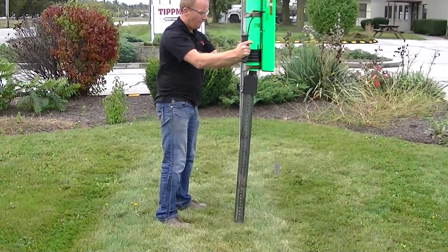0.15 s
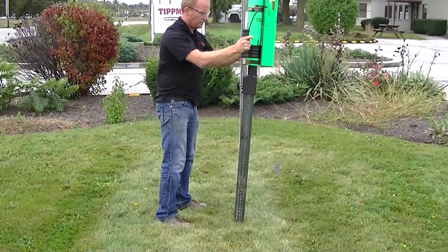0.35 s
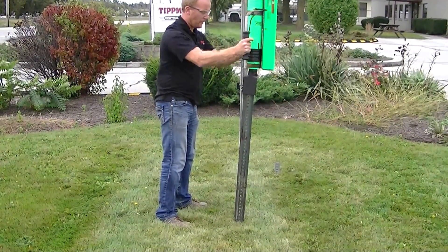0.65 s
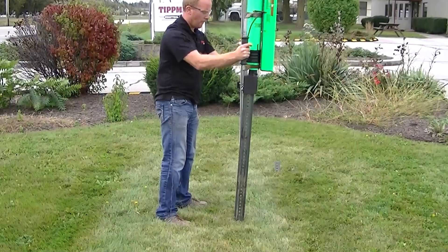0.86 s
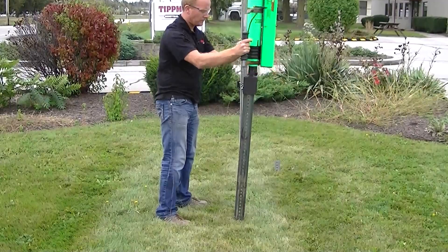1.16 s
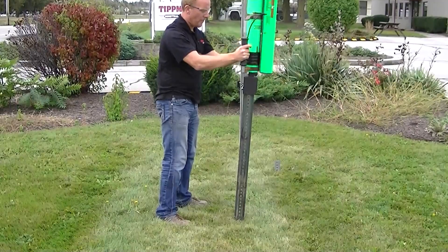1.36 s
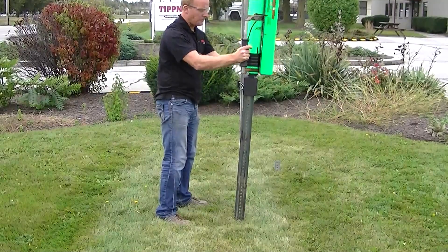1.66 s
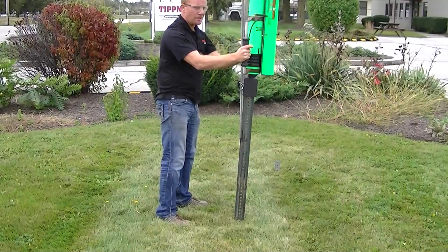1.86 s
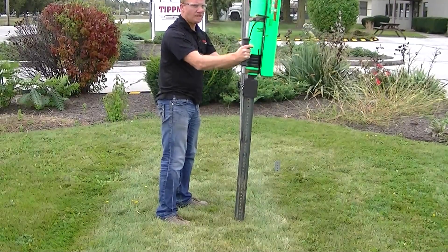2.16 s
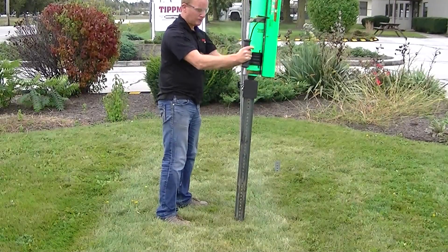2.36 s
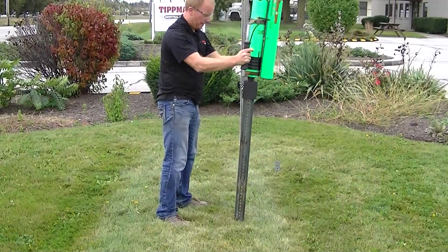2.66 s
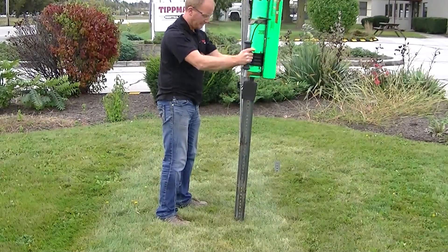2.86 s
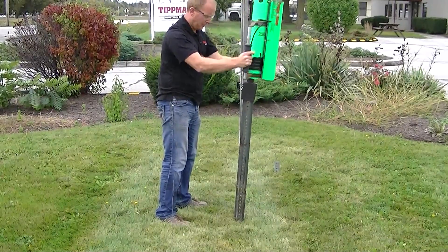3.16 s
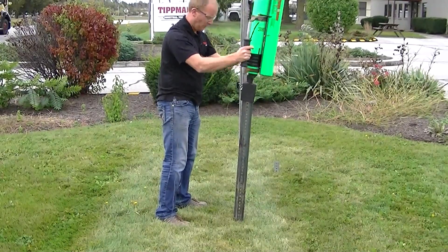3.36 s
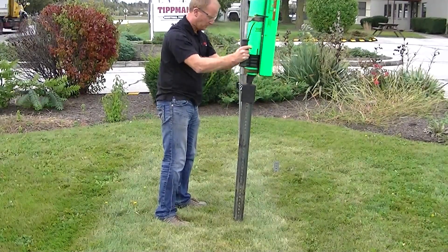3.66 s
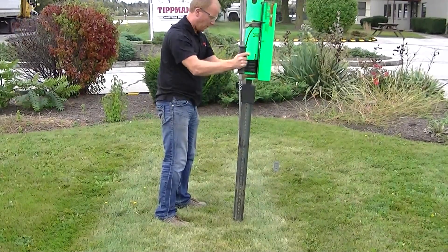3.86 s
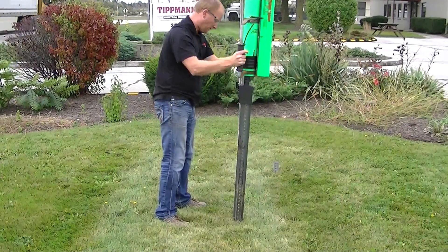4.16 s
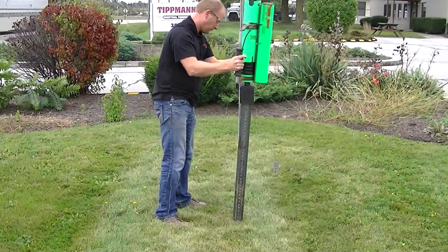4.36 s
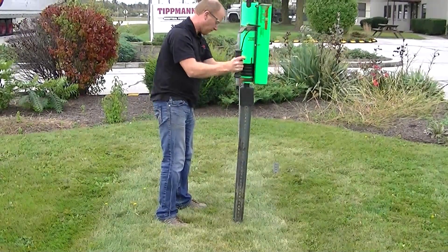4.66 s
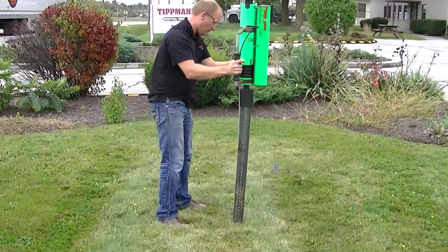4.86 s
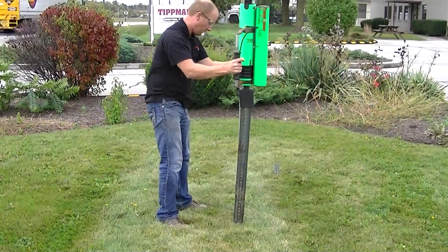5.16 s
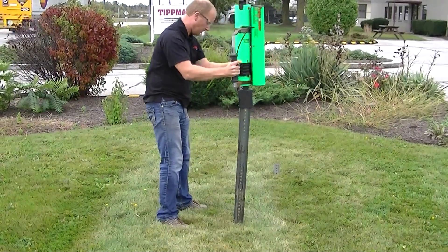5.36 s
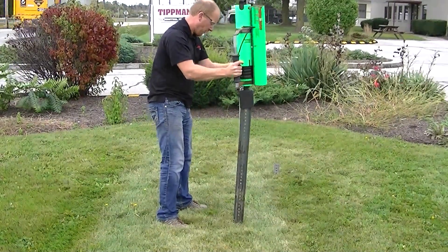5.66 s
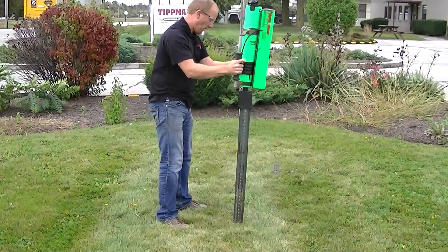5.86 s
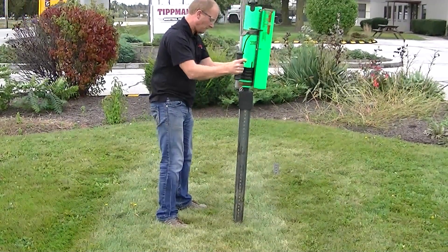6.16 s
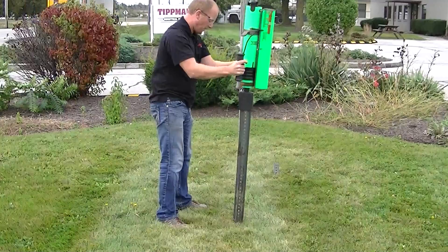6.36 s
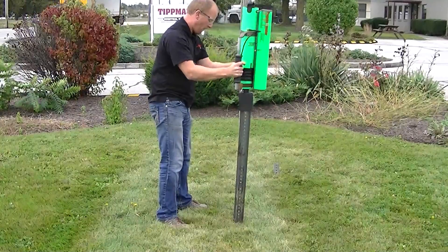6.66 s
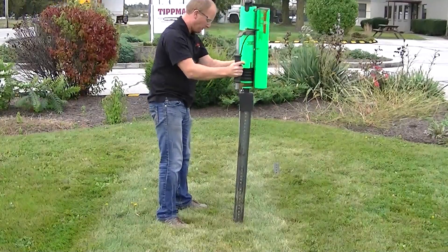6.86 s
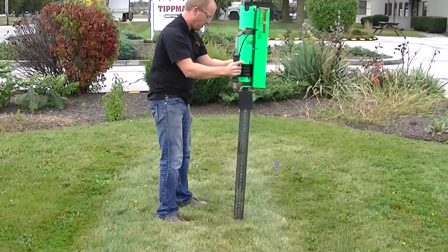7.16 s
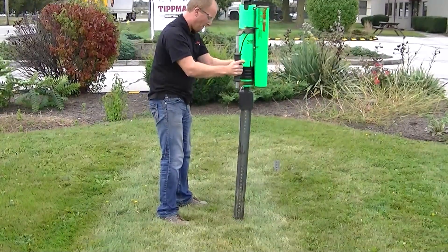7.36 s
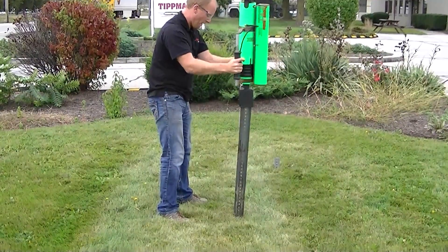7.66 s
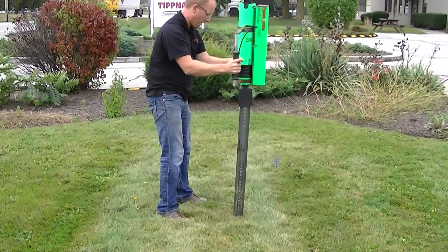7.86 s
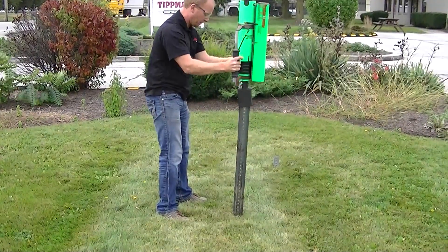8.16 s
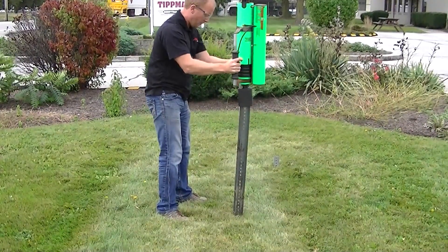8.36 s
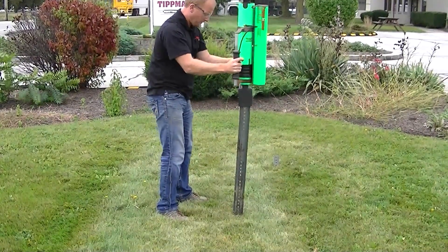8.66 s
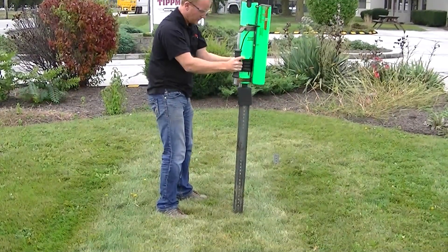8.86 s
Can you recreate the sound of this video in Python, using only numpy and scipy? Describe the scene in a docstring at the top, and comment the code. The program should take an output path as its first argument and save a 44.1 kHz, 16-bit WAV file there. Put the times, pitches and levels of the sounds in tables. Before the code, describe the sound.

A gas-fired post driver hammers a steel post, nearly four ringing bangs a second, with hissing gas and faint outdoor traffic.

```python
"""A lawn, outdoors: a gas-fired driver hammers in a steel post, nearly four blows a second.
Each cycle: a dull intake rush, the charge bangs, the piston strikes and steel rings, the piston
falls back with a clack and a puff. Gas hisses through the body until a valve shuts; loose parts
rattle. A wall returns a dull echo; traffic and wind lie below."""
import sys
import numpy as np
from scipy import signal
from scipy.fft import rfft, irfft
from scipy.io import wavfile
from scipy.ndimage import uniform_filter1d

SR = 44100
rng = np.random.default_rng(int(sys.argv[2]) if len(sys.argv) > 2 else 0)


def wav_record(signal):
    """Record a signal, one row per channel, as 16-bit PCM in the file named by sys.argv[1]."""
    frames = np.transpose(np.atleast_2d(signal))
    bounded = np.clip(frames, -1, 1)
    # unit amplitude maps onto the largest positive 16-bit level
    quanta = np.round(bounded * 32767).astype(np.int16)
    wavfile.write(sys.argv[1], SR, quanta)


N = 396900
T = np.arange(N) / SR

# wind and traffic: t/s, level/dB
OUTDOOR_LEVEL = [(0, -28), (2.3, -35.5), (4.3, -31), (6.5, -33), (7.4, -41), (9, -31.5)]
# traffic spectrum: f/Hz, density/dB
TRAFFIC_SPECTRUM = [(40, -4.5), (180, 1), (800, -20.5), (3500, -21.5), (5200, -26), (16000, -20)]
# wind spectrum: f/Hz, density/dB
WIND_SPECTRUM = [(40, -8), (165, 7), (800, -11.5), (16000, -34)]
# noise in the driver body: f/Hz, density/dB
BODY_SPECTRUM = [(180, -17), (400, -10), (1300, -5), (2500, -4), (3800, -10.5), (5160, -15.5),
                 (6300, -17.5), (7700, -9), (10900, -6.5), (16000, -25.5)]
# body cavities: f/Hz, width/Hz, boost/dB
BODY_CAVITIES = [(826, 76, 6), (1850, 124, 7.5), (2256, 78, 7.5), (3450, 520, 5.5), (6504, 700, 10)]
# firings: t/s, bang/dB, anvil ring/dB, rings near 6 kHz/dB, valve open/s
FIRINGS = [(0.1053, -4.5, -42, -16.5, 0.23), (0.375, -3, -26, -34, 0.29), (0.6449, -3, -29.5, -34, 0.26),
           (0.9166, -2.5, -25.5, -98, 0.21), (1.1849, -2.5, -22.5, -18.5, 0.27),
           (1.4766, -1, -22, -19.5, 0.25), (1.7467, -3, -22, -40, 0.25), (2.0138, -2.5, -25.5, -48, 0.34),
           (2.284, -5.5, -32, -20.5, 0.37), (2.53, -5, -27, -30, 0.26), (2.799, -2, -17, -23.5, 0.26),
           (3.091, -3.5, -23.5, -28, 0.26), (3.383, -1, -21.5, -26, 0.28), (3.6793, -2.5, -27, -23, 0.25),
           (3.921, -2, -22, -25, 0.33), (4.1915, -4, -20.5, -25, 0.2), (4.456, -3, -29.5, -35, 0.24),
           (4.725, -2.5, -27, -25, 0.23), (4.9759, -4.5, -31, -27, 0.2), (5.248, -2.5, -28.5, -25, 0.23),
           (5.517, -2, -29.5, -38, 0.2), (5.7617, -3, -39, -27, 0.27), (6.0547, -3, -26.5, -18, 0.232),
           (6.3204, -3, -26.5, -19, 0.24), (6.59, -4.5, -30.5, -34, 0.24), (6.8387, -3.5, -37, -20.5, 0.27),
           (7.0892, -2.5, -30, -32, 0.23), (7.3412, -2, -32, -26, 0.34), (7.6395, -2, -34, -23, 0.36),
           (7.9465, -2, -35, -23, 0.26), (8.2168, -1, -35.5, -27, 0.38), (8.5324, -2, -49, -24, 0.41),
           (8.7781, -3, -40, -26.5, 0.23)]
# firing chamber air modes: f/Hz, level/dB, t60/s, left minus right/dB
CHAMBER_MODES = [(246, -12.5, 0.031, 3), (502, -7.5, 0.027, -9.5), (873, 3.5, 0.014, -8.5),
                 (1074, -5, 0.019, -4.5), (1471, -14.5, 0.051, -5.5)]
# steel modes: f/Hz
MODE_HZ = [576, 1109, 1936, 2762, 2988, 3477, 6000, 6375, 6497, 7730, 8755, 8925, 9262, 9950, 10210, 10760,
           11010, 12325, 15210, 15400]
# same modes: level in group/dB, t60/s
MODE_LEVEL_T60 = [(5.5, 0.086), (-12, 0.36), (9.5, 0.63), (18.5, 0.097), (3, 0.15), (-2.5, 0.66), (0, 0.14),
                  (-6.5, 0.51), (-12.5, 0.61), (-26, .6), (-7, 0.1), (-11, 0.52), (-14, 0.99), (-16.5, 0.2),
                  (-15, 0.24), (-17, 1), (-16, 0.14), (-30, 0.16), (-10, .13), (-20, 0.24)]
# sleeve ring, freer or choked as the driver shifts on the post: t/s, level/dB
SLEEVE_LEVEL = [(0.1, -37.5), (0.65, -28), (2.0, -26), (2.28, -39), (2.8, -26.5), (3.38, -30), (3.68, -21),
                (4.2, -30.5), (4.98, -48), (6.05, -40), (7.4, -51), (8.3, -34), (8.8, -38)]
# blows that leave the sleeve hanging free: t/s
FREE_SLEEVE_S = [.6451, 3.6795]
# treble rings: t/s, level/dB
TREBLE_LEVEL = [(0.1, -18), (3, -19), (6, -20.5), (6.6, -23.5), (7.6, -18.5), (8.8, -18)]
# piston return: t/s, delay after firing/s
RETURN_DELAY = [(1.2, 0.082), (2.4, .081), (3.2, 0.085), (5.4, 0.078), (6.9, .087), (8.8, .082)]
# loose parts, the last row a sharp click just before the firing at 7.95 s: t/s, level/dB, f/Hz
KNOCKS = [(1.328, -21.5, 2180), (1.388, -25, 1850), (1.683, -25, 3430), (2.187, -20, 1430),
          (2.727, -21.5, 3600), (2.973, -24, 3220), (4.095, -26, 3150), (4.943, -25, 2370),
          (5.436, -18, 2760), (5.972, -23, 3530), (7.761, -18, 2280), (7.843, -18.5, 1930),
          (8.17, -18, 2080), (8.339, -20, 3670), (8.423, -13, 2700), (3.329, -25, 2760),
          (7.922, -20.5, 6850)]

STRIKE_S = .006   # firing to piston blow


def amp(db):
    """Decibels to gain."""
    return 10 ** (np.asarray(db) / 20)


def unit_rms(x):
    """Scale to rms 1."""
    return x / np.sqrt(np.mean(x ** 2))


def curve(times, table):
    """Interpolate a two-column table."""
    return np.interp(times, *np.transpose(table))


def butter(x, order, hz, kind="band"):
    """Butterworth filter."""
    return signal.sosfilt(signal.butter(order, hz, kind, fs=SR, output="sos"), x)


def coloured(spectrum, channels, cavities=()):
    """Shaped noise with resonant humps, rms 1."""
    hz, level_db = np.transpose(spectrum)
    bins_hz = np.fft.rfftfreq(N, 1 / SR) + 1
    db = np.interp(np.log(bins_hz), np.log(hz), level_db)
    for centre_hz, width_hz, boost_db in cavities:
        db += boost_db / (1 + (2 * (bins_hz - centre_hz) / width_hz) ** 2)
    return unit_rms(irfft(rfft(rng.standard_normal((channels, N))) * amp(db), N))


def drift(hz):
    """Low-passed random wander, rms 1."""
    pole = np.exp(-2 * np.pi * hz / SR)
    return unit_rms(signal.lfilter([1], [1, -2 * pole, pole ** 2], rng.standard_normal(N + SR))[SR:])


def pulses(times, db, rise_s, t60_s):
    """Envelope: rise and decay at each time."""
    clicks = np.full(N, 1e-18)
    clicks[np.round(times * SR).astype(int)] = amp(db)
    rise, decay = np.exp(-1 / (rise_s * SR)), amp(-60 / (t60_s * SR))
    return signal.lfilter([1 - rise], [1, -rise], signal.lfilter([1], [1, -decay], clicks))


def add(out, at_s, sound):
    """Mix a sound in."""
    i = round(at_s * SR)
    out[:, i:i + sound.shape[1]] += sound[:, :N - i]


def traffic_and_wind():
    """Far traffic ahead, in phase; lumpy low wind, opposed at the two microphone ports."""
    db = curve(T, OUTDOOR_LEVEL)
    traffic = amp(db - 7 + 2.05 * drift(21)) * coloured(TRAFFIC_SPECTRUM, channels=1)
    wind = amp(db + 4.1 * drift(9.6)) * coloured(WIND_SPECTRUM, channels=1)
    return traffic * amp([[-1.5], [1.5]]) + wind * [[1], [-1]]


def body_noise(side_db):
    """Stereo noise coloured by the driver's cavities."""
    mid, side = coloured(BODY_SPECTRUM, channels=2, cavities=BODY_CAVITIES)
    return mid + amp(side_db) * side * [[1], [-1]]


def gas_hiss(times, db):
    """Gas flow, reset at each firing; five bands sputter, partly in step."""
    flow = uniform_filter1d(amp(np.append(-31.5, db))[np.searchsorted(times, T)], size=250)
    noise, common, out = body_noise(side_db=-10), drift(11), 0
    for band_hz in [(300, 1300), (1300, 2700), (2700, 5200), (5200, 8500), (8500, 16500)]:
        sputter_db = np.clip(3.5 * common + 2.5 * drift(50), -11, 7)
        out += butter(noise, 2, band_hz) * amp(sputter_db)
    return flow * out


def valve(times, open_s, leak_db=-14.5):
    """Gas path gain: opens on firing, leaks when shut."""
    shut = (T > times[0] - .035) & (T < times[0])
    for shut_s, next_s in zip(times + open_s, np.append(times[1:], T[-1])):
        shut |= (T > shut_s) & (T < next_s)
    return uniform_filter1d(np.where(shut, amp(leak_db), 1.), size=250)


def chatter(gate, ticks_per_s=35, growth_db_per_s=.61):
    """The loose fit ticks unevenly while gas flows."""
    position, softness = rng.random((round(ticks_per_s * N / SR), 2)).T
    times = position * T[-1]
    ticks = pulses(times, -29 + growth_db_per_s * times - 16.4 * softness, rise_s=.0005, t60_s=.02)
    return unit_rms(butter(body_noise(side_db=-10), 2, [1500, 4000])) * ticks * gate


def intake_and_exhaust(times, return_s, gate):
    """A dull rush draws in the charge; the returning piston expels a bright puff."""
    noise = body_noise(side_db=-8)
    dull = unit_rms(butter(noise, 2, 1600, "low"))
    bright = unit_rms(butter(noise, 2, [2800, 8000]))
    rush = pulses(times - .024, db=-27.5, rise_s=.015, t60_s=.18)
    puff = pulses(times + return_s, db=-30, rise_s=.016, t60_s=.48)
    return dull * rush + bright * gate * puff * amp(2.86 * drift(90))


def bang(times, db):
    """The charge ignites and bursts; chamber air modes ring, suction first."""
    out, t = np.zeros((2, N)), T[:SR // 20]
    modes = sum(-amp(mode_db + pan_db * np.array([[.5], [-.5]]) - 60 * t / t60_s)
                * np.sin(2 * np.pi * hz * t) for hz, mode_db, t60_s, pan_db in CHAMBER_MODES)
    for at_s, gain in zip(times, amp(db)):
        add(out, at_s, gain * modes)
    ignition = pulses(times - .009, db - 24, rise_s=.001, t60_s=.2)
    burst = pulses(times, db - 6, rise_s=.000057, t60_s=.034)
    return out + body_noise(side_db=-15) * (ignition + burst)


def steel_ring(times, return_s, sleeve_db, anvil_db, six_khz_db, treble_db, rebound_s=.018):
    """Struck modes waver as loose parts touch; the returning piston damps them."""
    out, t = np.zeros((2, N)), T[:SR // 4]
    hz = np.array(MODE_HZ)[:, None]
    mode_db, t60_s = np.transpose(MODE_LEVEL_T60)[:, :, None]
    sleeve, anvil = 2, 3   # mode rows
    groups = [hz < edge_hz for edge_hz in (800, 1500, 2300, 2900, 3200, 5000, 7000)]
    spread_db = np.where(hz < 2900, 1, 4.5)
    damping_db_per_s = np.where(hz > 5000, 300, 200)
    chance = rng.standard_normal((len(times), 3, len(hz), 1))
    touches = uniform_filter1d(rng.standard_normal((len(times), len(hz), SR // 400 + 1)), size=3)
    for k, at_s in enumerate(times):
        strength, skew, pan = chance[k]
        group_db = np.select(groups, [-21.5, .9 * sleeve_db[k] + 6, sleeve_db[k], anvil_db[k],
                                      .5 * anvil_db[k] - 12, .5 * anvil_db[k] - 16, six_khz_db[k]],
                             treble_db[k])
        envelope = amp(group_db + mode_db + spread_db * strength - 60 * t / t60_s)
        envelope *= 1 - np.exp(-t / .0017)
        damping_db = damping_db_per_s * np.maximum(t - (return_s[k] - STRIKE_S), 0)
        # rebound chokes the anvil and wakes the sleeve; a free sleeve rings at once, and longer
        rebound = 1 / (1 + np.exp(-(t - rebound_s * (1 + .1 * skew[0])) / .0015))
        envelope[anvil] *= amp(-3.5 * rebound)
        if np.isclose(at_s, FREE_SLEEVE_S, atol=.01).any():
            envelope[sleeve] *= 1 - np.exp(-t / .0029)
            damping_db[sleeve] *= .2
        else:
            envelope[sleeve] *= .15 + rebound
        contact = np.repeat(touches[k], 100, axis=1)[:, :len(t)]
        envelope *= amp(5.2 * uniform_filter1d(contact, size=150) - damping_db)
        phase = 2 * np.pi * hz * (1 + .0012 * skew) * t
        mid = (envelope * np.sin(phase)).sum(0)
        side = (envelope * .4 * pan * np.cos(phase)).sum(0)   # uneven radiation
        add(out, at_s + STRIKE_S, np.array([mid + side, mid - side]))
    # modes too dense to resolve
    crash = pulses(times + STRIKE_S, treble_db + 4.5, rise_s=.0006, t60_s=.06)
    tail = pulses(times, treble_db - 12, rise_s=.003, t60_s=.5)
    return out + body_noise(side_db=-6) * (crash + tail)


def jangle(times, return_s, treble_db, modes=40):
    """The loose fit of driver and post excites stray modes on every blow."""
    out, t = np.zeros((2, N)), T[:SR // 8]
    for at_s, db, delay_s in zip(times, treble_db, return_s):
        pitch, size, pan, life = rng.random((4, modes, 1))
        hz = np.where(pitch < .2, 2300 + 6000 * pitch, 3700 + 11500 * pitch)
        t60_s = .28 * (.19 + life)
        start_db = db - 14.5 + 9.7 * (size - .5)
        damping_db = 250 * np.maximum(t - (delay_s - STRIKE_S), 0)
        envelope = amp(start_db - 60 * t / t60_s - damping_db) * (1 - np.exp(-t / .002))
        rings = envelope * np.sin(2 * np.pi * hz * t)
        add(out, at_s + STRIKE_S, np.array([(rings * (.5 + pan)).sum(0), (rings * (1.5 - pan)).sum(0)]))
    return out


def piston_clack(times, db):
    """The piston lands on its stop: sharp tick, short dull burst in the body."""
    burst = pulses(times - .003, db + 4.5, rise_s=.0035, t60_s=.046) * amp(drift(310))
    tick = pulses(times, db, rise_s=.0002, t60_s=.015)
    dull = butter(body_noise(side_db=-8.5), 1, 3000, "low")
    return dull * burst + body_noise(side_db=-17) * tick


def wall_echo(bangs, delay_s=.159):
    """A wall returns each bang dulled; the echo grows louder over time."""
    out = np.zeros_like(bangs)
    dull = butter(bangs, 1, [760, 900]) + .5 * butter(bangs, 1, [200, 500])
    add(out, delay_s, amp(-23 + .7 * T) * dull)
    return out


def rattle(t60_s=.025):
    """Loose parts knock, and one sharp click leads a firing: a noisy ring at each pitch, plus body noise."""
    times, db, pitch_hz = np.transpose(KNOCKS)
    out, t = np.zeros((2, N)), T[:SR // 20]
    for at_s, gain, hz in zip(times, amp(db - .5), pitch_hz):
        hit = rng.standard_normal((1, len(t))) * amp(-60 * t / t60_s)
        knock = butter(hit, 1, [hz / 1.06, hz * 1.06])
        add(out, at_s, gain * knock / abs(knock).max())
    return out + body_noise(side_db=-10) * pulses(times, db - 2, rise_s=.0006, t60_s=.035)


def scene():
    """Stereo mix; clack and hiss levels vary at random per cycle."""
    times, bang_db, anvil_db, six_khz_db, open_s = np.transpose(FIRINGS)
    sleeve_db, treble_db = curve(times, SLEEVE_LEVEL), curve(times, TREBLE_LEVEL)
    return_s = curve(times, RETURN_DELAY)
    clack_scatter, hiss_scatter = rng.standard_normal((len(times), 2)).T
    gate = valve(times, open_s)
    clacks = piston_clack(times + return_s, db=-11 + 1.5 * clack_scatter)
    bangs = bang(times, bang_db)
    rings = steel_ring(times, return_s, sleeve_db, anvil_db, six_khz_db, treble_db)
    rings += jangle(times, return_s, treble_db)
    gas = gate * gas_hiss(times, db=-29.5 - .39 * times + 5 * hiss_scatter)
    gas += intake_and_exhaust(times, return_s, gate)
    driver = bangs + rings + clacks + gas + rattle() + chatter(gate)
    return driver * amp([[-.6], [.6]]) + wall_echo(bangs) + traffic_and_wind()


def record(dry, ceiling=.87, stopband_hz=16500):
    """Close port pair: bass thinned, slightly out of phase. Then soft clip and top cut."""
    bass = butter(dry.mean(0), 2, 320, "low")
    thinned = dry - .64 * bass + .023 * bass * [[-1], [1]]
    thinned = butter(thinned, 2, 80, "high")
    clipped = ceiling * np.tanh(thinned / ceiling)
    return signal.sosfilt(signal.cheby2(14, 70, stopband_hz, fs=SR, output="sos"), clipped)


dry = scene()
out = record(dry)
wav_record(out)
```